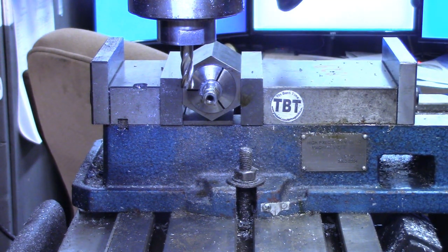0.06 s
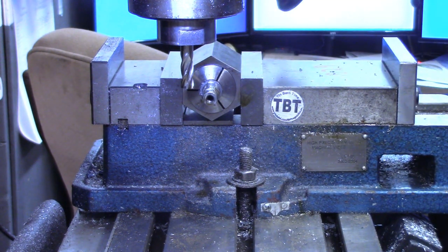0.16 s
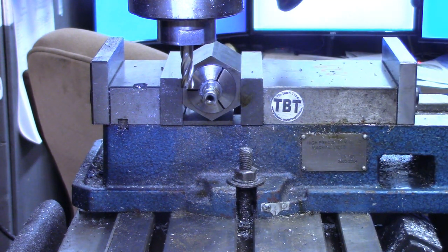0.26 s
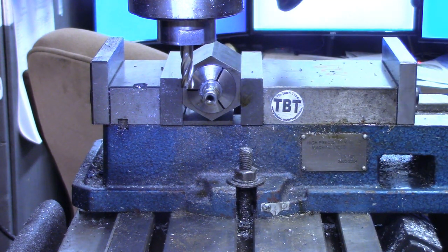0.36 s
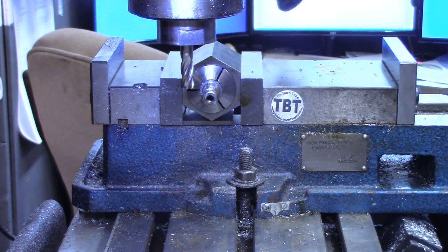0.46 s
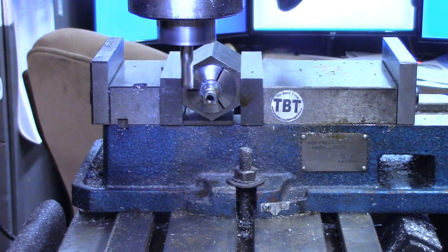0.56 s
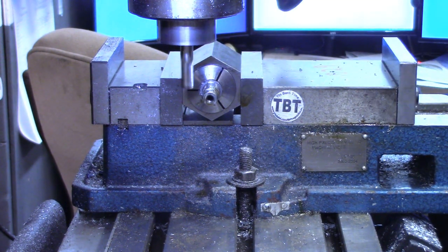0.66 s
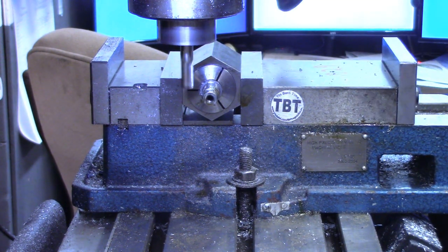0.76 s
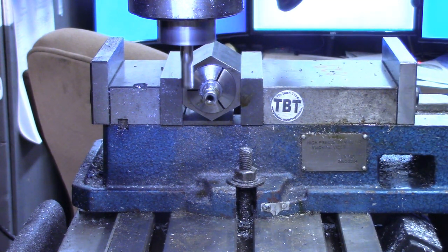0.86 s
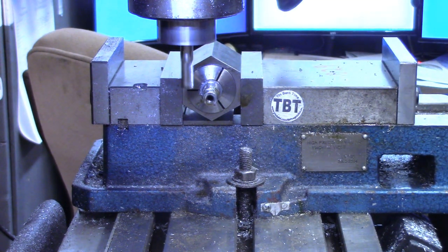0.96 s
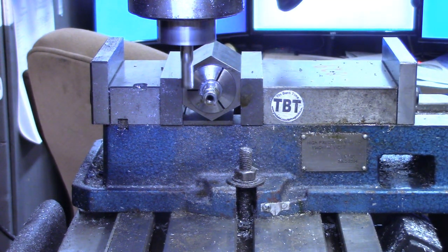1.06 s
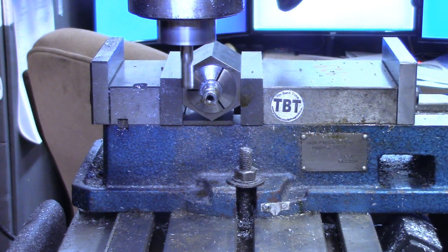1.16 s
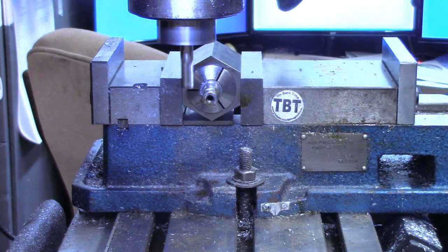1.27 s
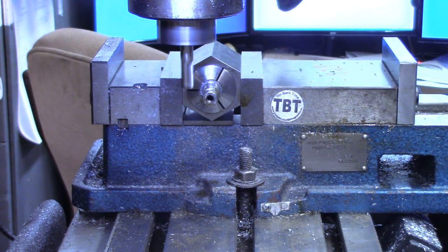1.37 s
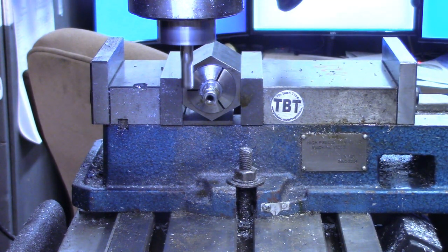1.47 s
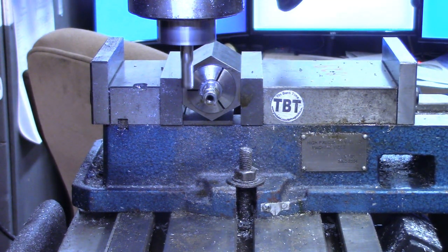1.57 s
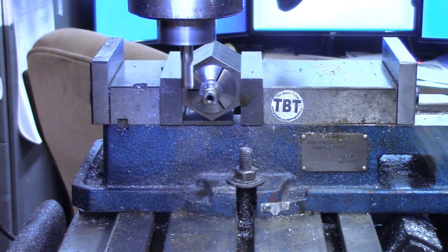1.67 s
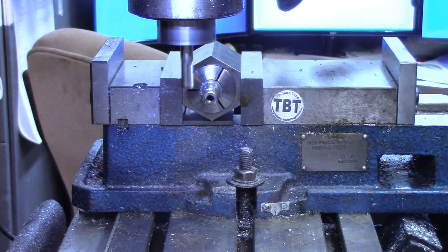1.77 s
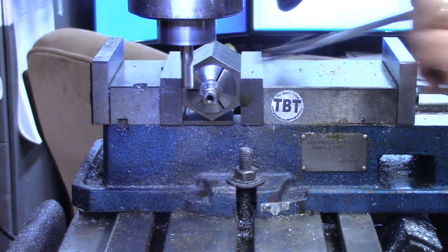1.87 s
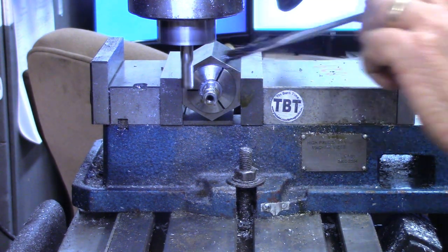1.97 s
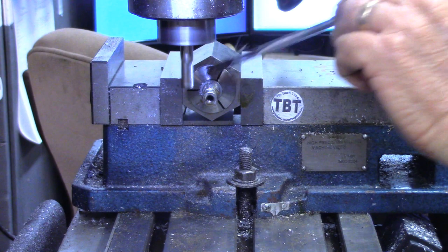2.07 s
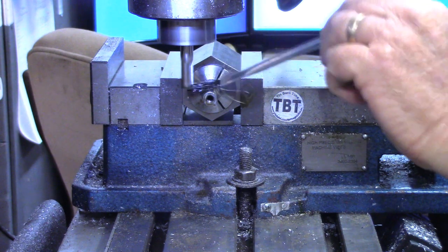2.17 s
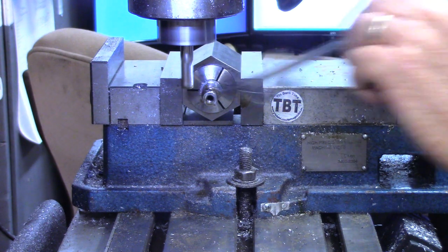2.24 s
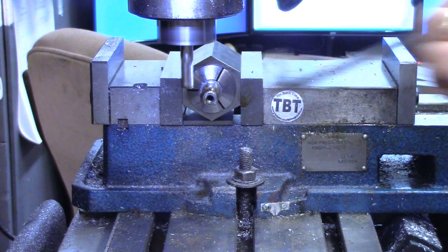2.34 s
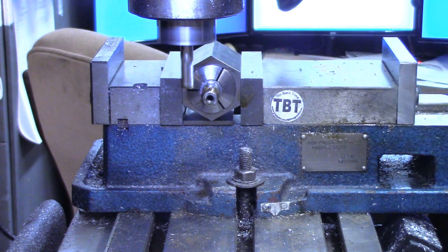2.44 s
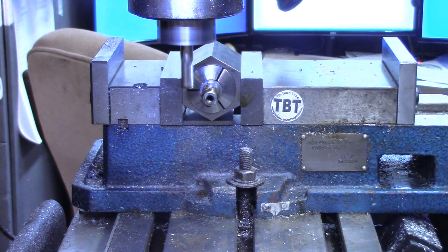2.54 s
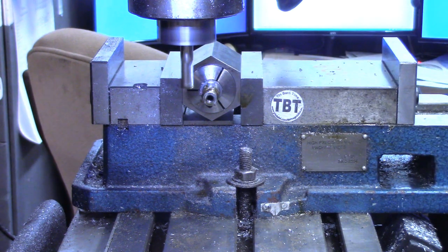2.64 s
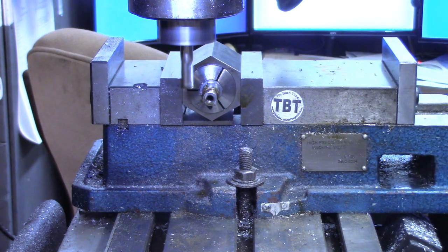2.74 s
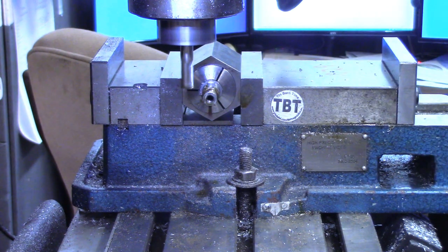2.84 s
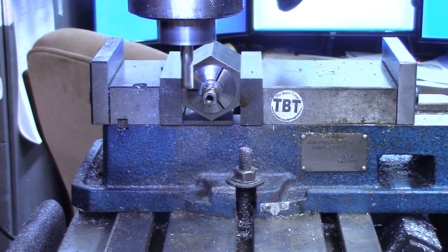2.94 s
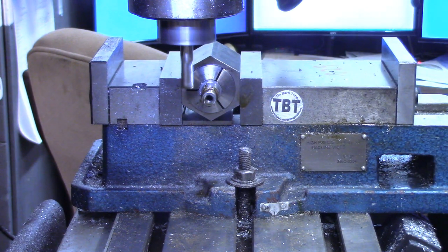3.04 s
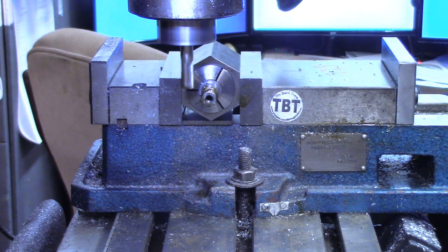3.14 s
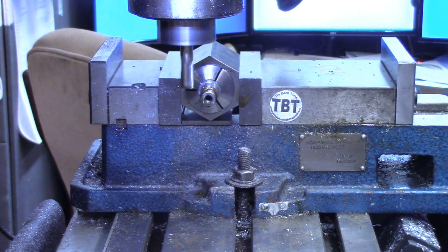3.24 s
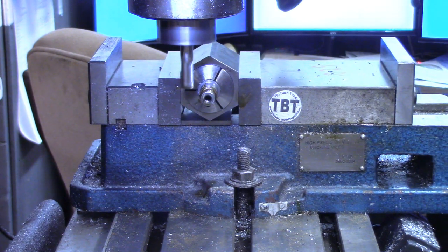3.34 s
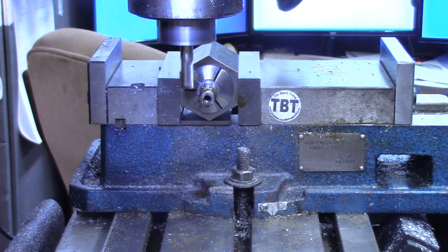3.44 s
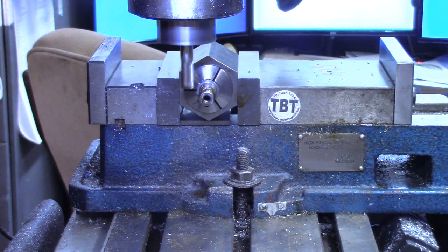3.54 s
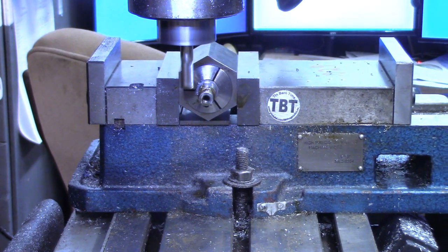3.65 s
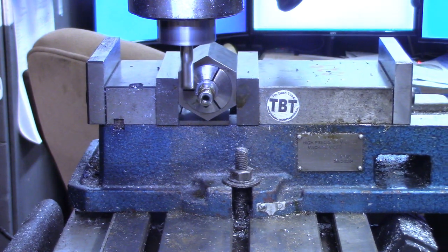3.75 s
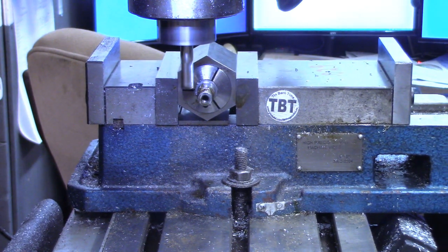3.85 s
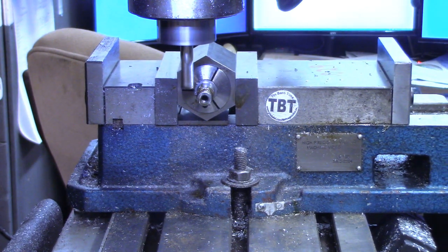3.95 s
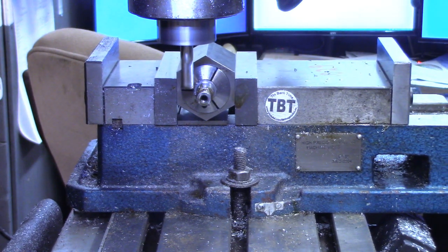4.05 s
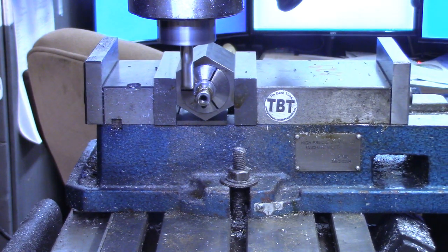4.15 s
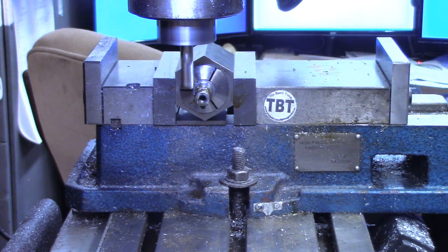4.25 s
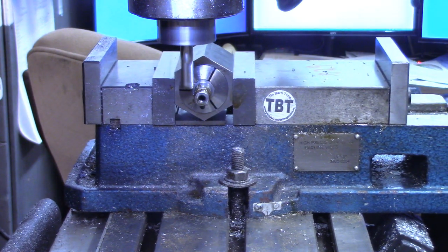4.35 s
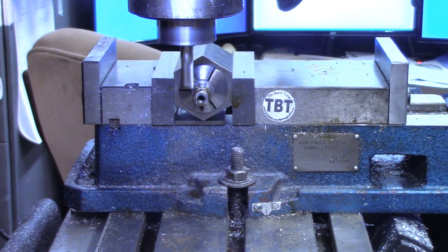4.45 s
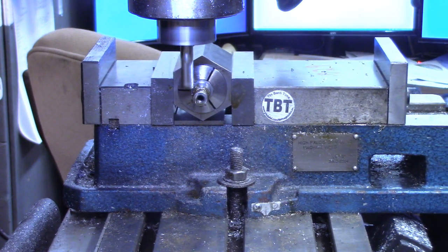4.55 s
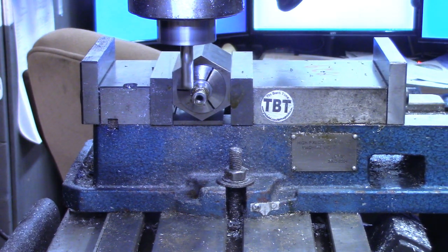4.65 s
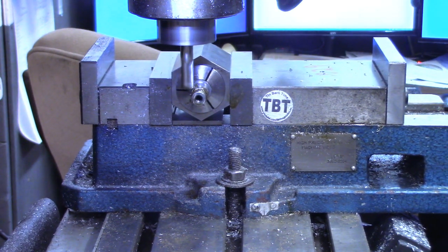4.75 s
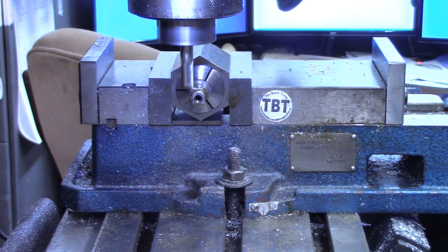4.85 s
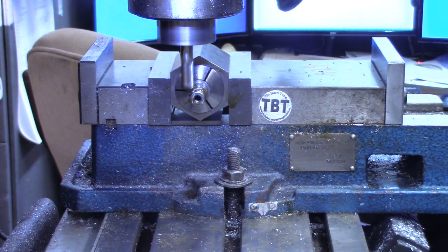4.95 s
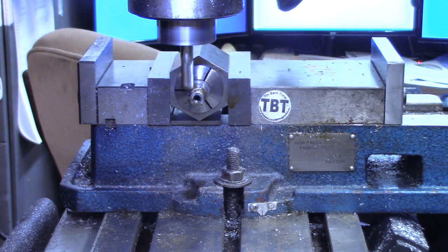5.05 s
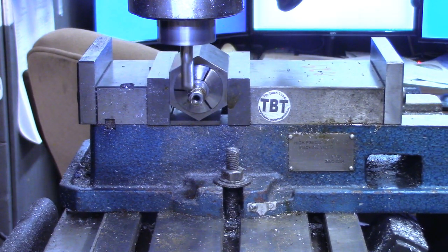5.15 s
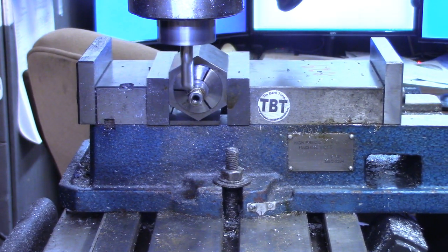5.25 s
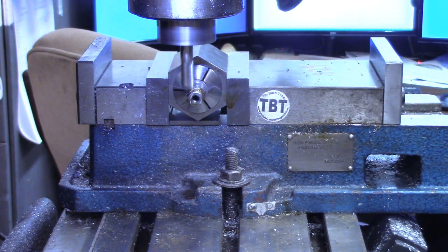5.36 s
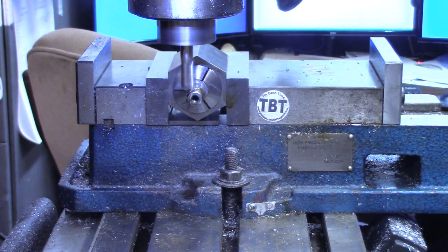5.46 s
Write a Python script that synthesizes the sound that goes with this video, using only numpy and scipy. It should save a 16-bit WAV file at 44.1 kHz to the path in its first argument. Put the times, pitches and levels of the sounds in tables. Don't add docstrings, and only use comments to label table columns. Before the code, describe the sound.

A fixed nearby microphone with very short room reflections hears near-silence, a tiny double click, then a loud clattering electrical clunk as the milling machine starts. Loose gears immediately chatter about twenty pulses a second, with a buzzing ripple, motor hum and a mid-pitched whine that swells and dips. It holds steady until the end, when a gritty scraping cut with high whistle enters and the rattle tightens. It stops abruptly, still running.

```python
import sys
import numpy as np
from scipy import signal
from scipy.io import wavfile
from scipy.ndimage import uniform_filter1d

SR = 44100
rng = np.random.default_rng(int(sys.argv[2]) if len(sys.argv) > 2 else 0)


def invert_db(x):
    u = np.asarray(x, float) / 20
    return 10 ** u


def log_audio(samples):
    frames = np.atleast_2d(samples).T
    limited = np.clip(frames, -1, 1)
    pcm = np.round(limited * 32767).astype(np.int16)
    wavfile.write(sys.argv[1], SR, pcm)


N = 242991

SHAFT_HZ, RIPPLE_HZ = 19.812, 120.01


def evened(x):
    return x / np.sqrt(np.mean(x ** 2) + 1e-20)


def curve(rows, column=1, before=-120.):
    rows = np.array(rows)
    return np.interp(np.arange(N) / SR, rows[:, 0], rows[:, column], left=before)


def read(points, hz):
    f, value = np.transpose(points)
    return np.interp(np.log(hz), np.log(f), value)


def coloured(x, db_at):
    hz = abs(np.fft.fftfreq(8192, 1 / SR)) + 1
    log_gain = np.maximum(db_at(hz), -100) * np.log(10) / 20
    spectrum = np.exp(np.conj(signal.hilbert(log_gain)))
    taps = np.fft.ifft(spectrum).real[:4096]
    return signal.oaconvolve(x, taps)[:len(x)]


def resonate(x, hz, width):
    r = np.exp(-np.pi * width / SR)
    pole = r * np.exp(2j * np.pi * hz / SR)
    return 2 * signal.lfilter([1 - r], [1, -pole], x).real


def twice(x, hz, width):
    return resonate(resonate(x, hz, width), hz, width)


def steep(x, hz, width):
    return evened(resonate(twice(x, hz, width), hz, width))


def throb(depth_db, angle, multiple=1):
    turns = np.arange(N) / SR * SHAFT_HZ - angle
    return invert_db(depth_db * np.cos(2 * np.pi * multiple * turns))


def flicker(depth_db, hz):
    return invert_db(depth_db * evened(twice(rng.standard_normal(N), 0, hz)))


# (frequency [Hz], density [dB per Hz])
SHOP_SPECTRUM = [(35, -37), (60, -15), (87, -13), (102, -15.5), (319, -15.5), (367, -18.5), (611, -16),
                 (807, -16.5), (1700, -26), (15400, -49.5)]
# (time [s], level [dB])
SHOP_LEVEL = [(0, -59.5), (.1, -62), (.3, -64.5), (.62, -63)]
# (time [s], level [dB])
RUSTLE_LEVEL = [(0, -73), (.06, -71), (.08, -99), (.09, -120)]
# (middle [s], spread [s], level [dB])
RUMBLE_GUSTS = [(.24, 0.096, -46), (.58, 0.022, -64), (1.15, 0.12, -64), (3.05, .12, -70), (3.6, .05, -66),
                (4.3, .2, -72.5)]


def shop():
    t = np.arange(N) / SR
    tone = evened(coloured(rng.standard_normal(N), lambda hz: read(SHOP_SPECTRUM, hz)))
    rustle = evened(resonate(rng.standard_normal(N), 8300, 8800))
    band = signal.butter(3, [21, 55], "bandpass", fs=SR, output="sos")
    low = signal.sosfilt(band, rng.standard_normal(N))
    low /= np.sqrt(uniform_filter1d(low ** 2, 5000) + 1e-12)
    swell = invert_db(-73) * flicker(1.2, 5.3)
    for middle, spread, db in RUMBLE_GUSTS:
        swell += invert_db(db) * np.exp(-.5 * ((t - middle) / spread) ** 2)
    return tone * invert_db(curve(SHOP_LEVEL)) + rustle * invert_db(curve(RUSTLE_LEVEL)) + low * swell


def walls(x):
    at = np.arange(200, 15000, 22) + rng.integers(0, 22, 673)
    tail = np.zeros(15100)
    tail[at] = rng.choice([-1., 1.], len(at)) * invert_db(-60 * at / SR / 0.086)
    dull = resonate(x, 0, 8200) / 2
    return signal.oaconvolve(dull, tail / np.linalg.norm(tail))[:N]


# (time [s], peak [dB], frequency [Hz], width [Hz], T60 [s])
START_BLOWS = [(.4690, -49, 1500, 1200, .015), (.4740, -48, 1500, 1200, .025),
               (.6262, -40, 2200, 3000, .03), (.6365, -30, 900, 1300, .15), (.640, -47, 8000, 7000, .05),
               (.6643, -22, 3700, 1800, .03), (.6644, -29, 6000, 2500, .025), (.6645, -36, 8700, 5000, .04),
               (.666, -28, 550, 450, .16), (.669, -25, 1400, 900, .04), (.683, -42, 8000, 7000, .08),
               (.690, -31, 1100, 1800, .1), (.698, -31, 480, 450, .12), (.708, -42, 9500, 6000, .14),
               (.7765, -30, 2000, 2000, .03), (.7767, -41, 5500, 3000, .03)]


def contactor():
    out = np.zeros(N)
    t = np.arange(6000) / SR
    for s, db, hz, width, t60 in START_BLOWS:
        burst = steep(rng.standard_normal(6000) * invert_db(-60 * t / t60), hz, width)
        out[round(s * SR):][:6000] += invert_db(db) * burst / abs(burst).max()
    return out


# (time [s], level [dB])
WHINE_LEVEL = [(.74, -65), (.8, -44.5), (1.1, -49), (1.55, -48), (2.2, -51.5), (2.9, -50.5), (3.7, -47.5),
               (3.97, -62), (4.35, -44.5), (4.7, -48.5), (4.9, -59), (5.11, -43), (5.24, -64), (5.51, -63)]
# (frequency [Hz], level [dB])
MAGNETIC_TONES = [(120, -70.5), (320.2, -67), (340.2, -84), (399.8, -57), (605.3, -63.5), (1494.3, -53.5)]
# (time [s], level [dB])
GROAN_LEVEL = [(.625, -80), (.65, -67), (.70, -63), (.82, -62), (.88, -90)]


def motor():
    t = np.arange(N) / SR
    whine_hz = 6 * RIPPLE_HZ - SHAFT_HZ
    wander = 0.12 * evened(resonate(rng.standard_normal(N), 0, 5.3))
    whine = np.sqrt(2) * np.sin(2 * np.pi * (whine_hz * t + wander)) * invert_db(curve(WHINE_LEVEL) - 2.5)
    cover = steep(rng.standard_normal(N), 708.3, 22.6)
    cover *= invert_db(-54 + 5 * curve(START_RATTLE).clip(-30, 0))
    cover *= 1 - 0.38 * invert_db(curve(CUT_LEVEL))
    hums = np.zeros(N)
    for f, db in MAGNETIC_TONES:
        hums += invert_db(db - 2) * np.sin(2 * np.pi * (f * t + rng.random()))
    hums *= 1.12 * np.clip((t - .7) / 0.21, 0, 1)
    groan = invert_db(curve(GROAN_LEVEL)) * np.sin(2 * np.pi * 190 * t)
    return (whine + cover) * throb(3.94, 0.66) + hums + groan


# (time [s], level [dB])
CUT_LEVEL = [(5.08, -40), (5.14, -9), (5.2, -4), (5.28, 0), (5.51, 0)]


def cutter():
    angle = 2 * np.pi * 4 * SHAFT_HZ * np.arange(N) / SR
    hum = invert_db(-64.0) * np.sin(angle) + invert_db(-64.5) * np.sin(3 * angle)
    noise = rng.standard_normal((3, N))
    breaks = 3.5 * np.minimum(rng.exponential(1, N // 100 + 1), 4)
    grit = noise[0] * invert_db(breaks).repeat(100)[:N]
    whistle = evened(resonate(resonate(grit, 5450, 226), 5300, 225)) * throb(3.7, 0.61)
    hiss = evened(resonate(resonate(grit, 8900, 2200), 10200, 2200))
    scrape = evened(twice(noise[2], 4800, 2700))
    growl = steep(noise[1], 414, 200)
    friction = invert_db(-53.0) * whistle + invert_db(-64.5) * hiss + invert_db(-52.0) * scrape + invert_db(-50) * growl
    return invert_db(curve(CUT_LEVEL) / 3) * hum + invert_db(curve(CUT_LEVEL)) * friction


def slack():
    t = np.arange(N) / SR
    onset_s, rise_s, overshoot_db, settle_s = .70, 0.038, 4, 0.13
    tighten_s, tighten_db_per_s = 5.17, -22
    rise = np.clip((t - onset_s) / rise_s, 0, 1) ** 2
    since = np.maximum(t - onset_s - rise_s, 0)
    overshoot = overshoot_db * np.exp(-since / settle_s)
    tightening = tighten_db_per_s * np.maximum(t - tighten_s, 0)
    return rise * invert_db(overshoot + tightening) * flicker(0.27, 1.0)


# (frequency [Hz], density [dB per Hz])
HEAD_SPECTRUM = [(90, -48), (150, -22), (260, -17.5), (400, -10), (600, -6.5), (900, -3.5), (1420, 0),
                 (2300, -4.5), (3900, -9.5), (6300, -23.5), (7400, -18.5), (9500, -30), (12000, -40),
                 (15400, -41)]
# (frequency [Hz], width [Hz], lift [dB])
HEAD_MODES = [(419, 127, 5), (569, 23, 1.5), (648, 32, -2.5), (819, 41, -6), (1419, 55, 5.5),
              (2315, 195, 4.5), (3140, 170, 2), (3544, 187, -5.5), (3750, 390, 3.5), (4740, 190, -3),
              (5410, 160, 3.5), (7830, 1350, -3.5), (12600, 320, 5)]


def head_modes_db(hz):
    return sum(db / (1 + (2 * (hz - f) / w) ** 2) for f, w, db in HEAD_MODES)


def head_db(hz):
    return read(HEAD_SPECTRUM, hz) + head_modes_db(hz)


KNOCK_PLACES = [(.43, 1, .80, .085), (.10, 0, .85, .065), (.18, 0, .41, .045), (.22, 0, .63, .04),
                (.20, 0, .07, .06)]
# (level [dB], frequency [Hz], width [Hz], second frequency [Hz], second level [dB])
KNOCK_COLOURS = [(-42, 2430, 1760, 7000, -16), (-46.5, 2640, 2100, 4300, -7), (-55, 3920, 1340, 5480, -5),
                 (-55.5, 3100, 1400, 7500, -13), (-61.5, 1330, 1400, 3760, 2)]


def knocks():
    out = np.zeros(N)
    for (place, lead, angle, spread), (db, hz, width, hz2, db2) in zip(KNOCK_PLACES, KNOCK_COLOURS):
        clock = RIPPLE_HZ + lead * SHAFT_HZ
        s = (np.arange(int(N / SR * clock) - 2) + place) / clock
        luck = rng.standard_normal((len(s), 2))
        at = abs((s + .0003 * luck[:, 0]) * SR).astype(int)
        off = (s * SHAFT_HZ - angle + .5) % 1 - .5
        blows = np.zeros(N)
        blows[at] = np.exp(-.5 * (off / spread) ** 2) * invert_db(1.2 * np.clip(luck[:, 1], -2, 1))
        decay = signal.lfilter([1], [1, -np.exp(-1 / (.003 * SR))], blows)
        bounces = decay * rng.choice([-1., 1.], N) + 1.5 * blows
        ring = steep(bounces, hz, width) + invert_db(db2) * steep(bounces, hz2, width)
        out += invert_db(db + 33) * ring
    return coloured(out, head_modes_db)


# (frequency [Hz], level [dB])
SHAFT_RINGS = [(400, -60), (425, -62), (462, -59), (566, -62), (582, -57), (939, -60), (1033, -62),
               (1116, -59), (1269, -59), (1400, -59), (1463, -56), (1538, -57), (1668, -56), (1891, -60),
               (2022, -59), (2223, -57), (2300, -59), (2370, -60), (2497, -59), (2676, -61), (2830, -63),
               (3050, -63), (3219, -62), (3725, -68), (4307, -69), (5000, -73), (6690, -77)]
# (time [s], rattle over its running level [dB], extra brightness [dB])
START_RATTLE = [(.625, -33, 0), (.63, -6.5, -1), (.645, -2.5, -2), (.662, -4.5, -6), (.668, 2.5, 0),
                (.70, 4, 1), (.732, 1.5, 3), (.745, -2.5, 2), (.85, 0, 0)]
# (time [s], level [dB])
RUNNING_RATTLE = [(.85, -37.5), (1.3, -36.5), (2.1, -36.5), (3.4, -36), (4.1, -37), (4.85, -37.5),
                  (5.0, -36), (5.2, -37.5), (5.3, -38.5), (5.51, -39.5)]


def rattle():
    size = invert_db(2.5 * np.minimum(rng.exponential(1, N), 3)) * (rng.random(N) < 4000 / SR)
    teeth = evened(size * rng.standard_normal(N)) + 0.73 * rng.standard_normal(N)
    low = signal.sosfilt(signal.butter(2, 1900, fs=SR, output="sos"), teeth)
    body = low * throb(1.1, .87) * flicker(0.49, 27.0)
    treble = (teeth - low) * flicker(1.32, 270.0) * throb(1.0, .78) * throb(0.09, 0.71, multiple=2)
    drive = body + treble * invert_db(curve(START_RATTLE, column=2, before=0))
    other = np.roll(drive, round(40 * SR / SHAFT_HZ))
    rings = np.zeros(N)
    for f, db in SHAFT_RINGS:
        rings += invert_db(db) * evened(resonate(resonate(other, f, 8.7), f, 47.0))
    return evened(coloured(drive, head_db)), invert_db(37) * rings


def scene():
    head, rings = rattle()
    level = invert_db(curve(START_RATTLE) + curve(RUNNING_RATTLE, before=RUNNING_RATTLE[0][1]))
    gears = invert_db(-2.0) * head + invert_db(-0.94) * slack() * knocks()
    machine = gears * level + contactor()
    echoes = invert_db(-12.5) * walls(machine)
    return (machine + echoes + rings * level + motor() + cutter() + shop())[None]


# (frequency [Hz], gain [dB])
MICROPHONE_RESPONSE = [(100, -1.5), (12600, 2), (13200, -1), (15000, -9), (15450, -1), (15600, -47)]


def top_cut(x):
    return signal.sosfilt(signal.butter(12, 15540, fs=SR, output="sos"), x)


def record(dry):
    heard = coloured(dry[0], lambda hz: read(MICROPHONE_RESPONSE, hz))
    return top_cut(heard[None])


dry = scene()
out = record(dry)
log_audio(out)
```